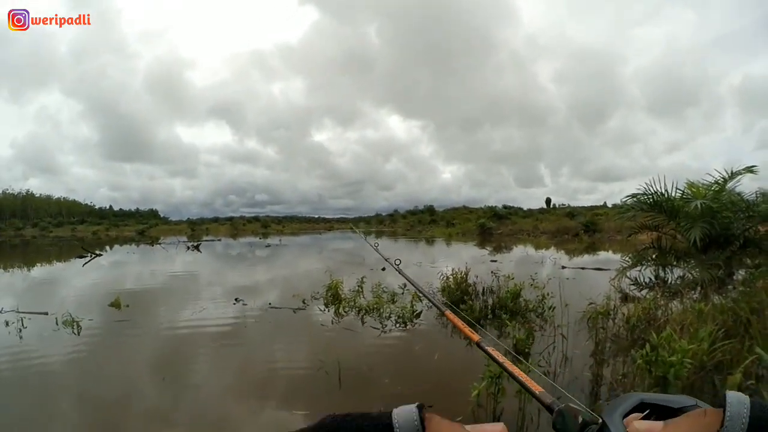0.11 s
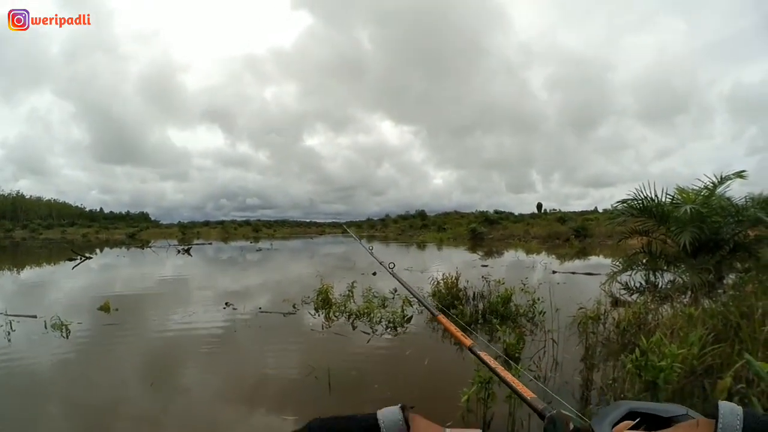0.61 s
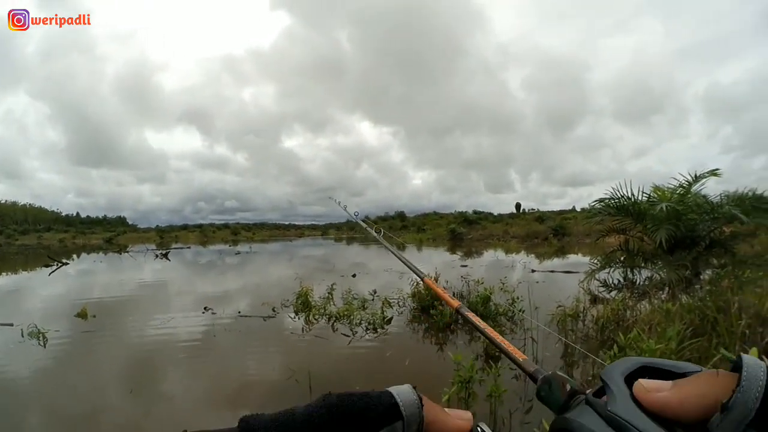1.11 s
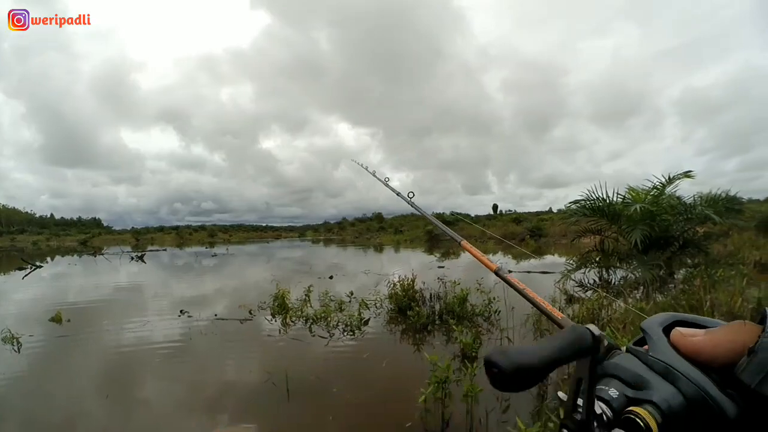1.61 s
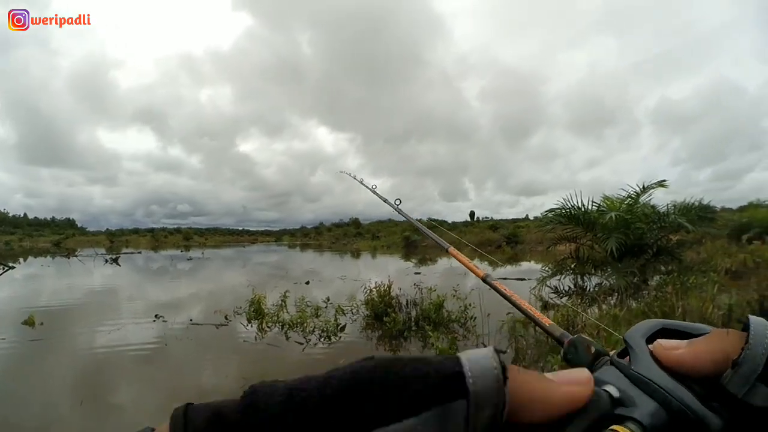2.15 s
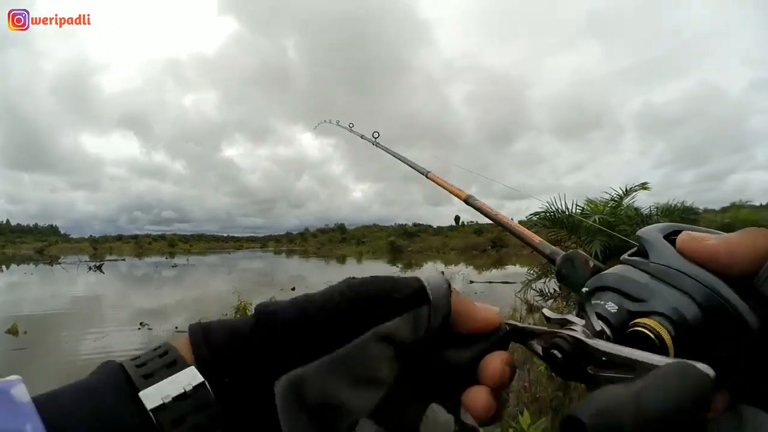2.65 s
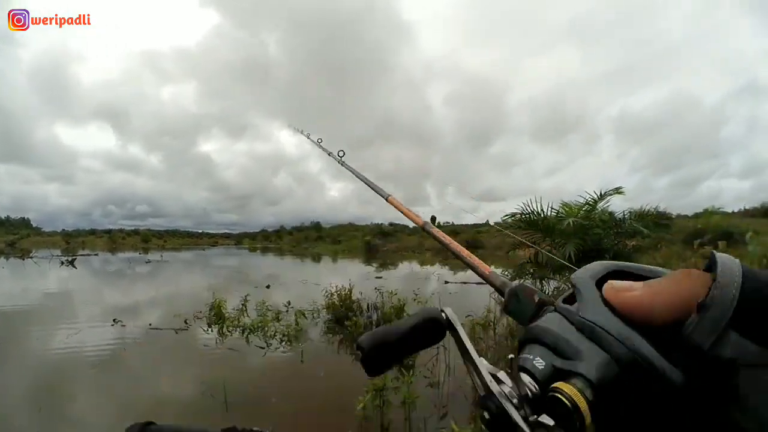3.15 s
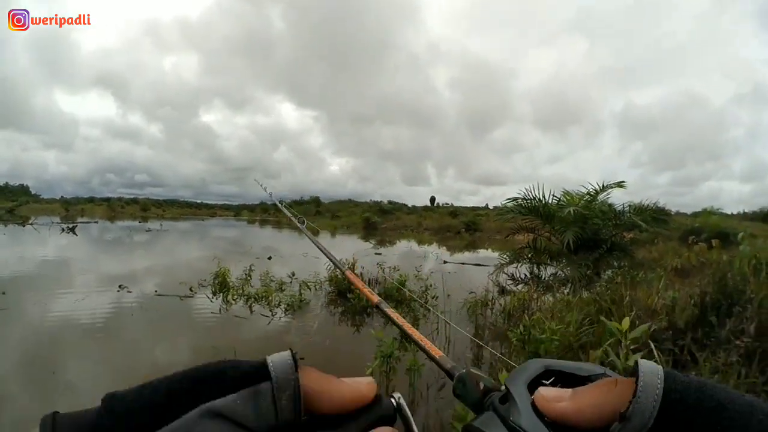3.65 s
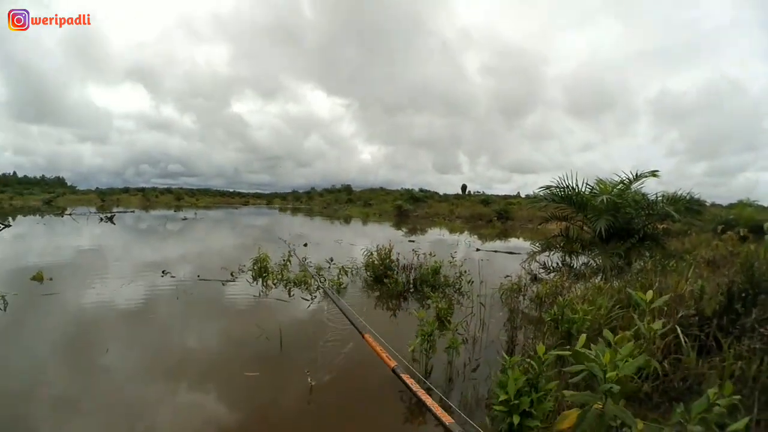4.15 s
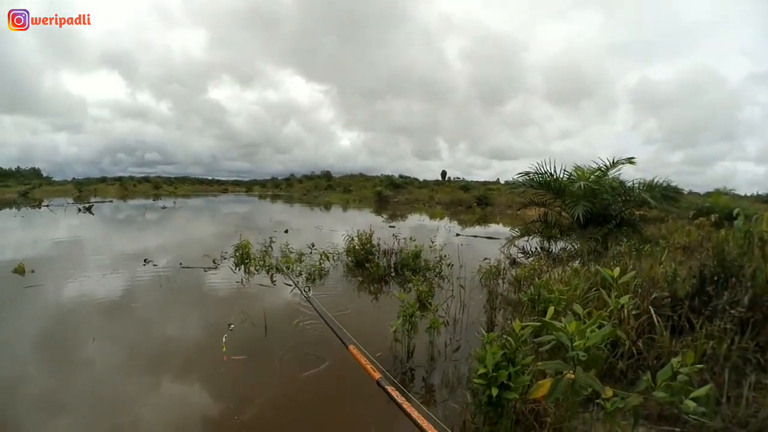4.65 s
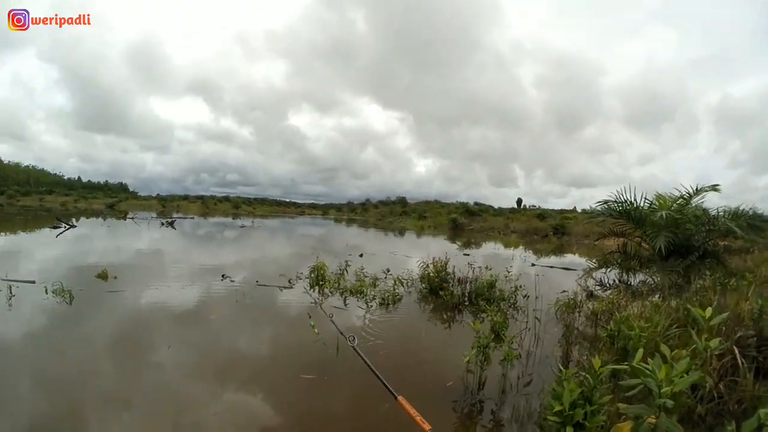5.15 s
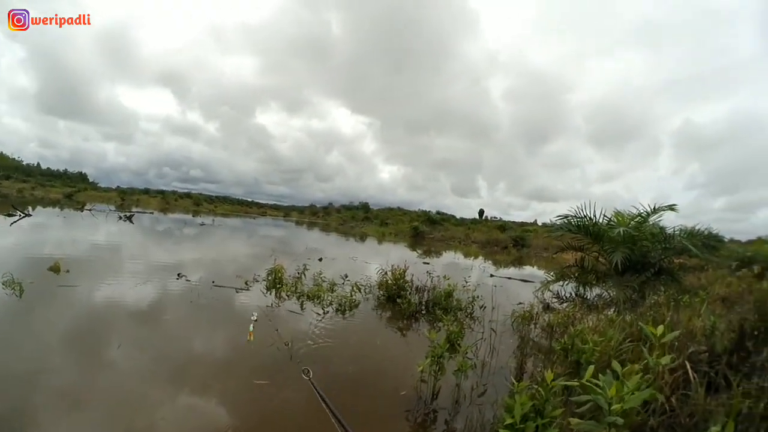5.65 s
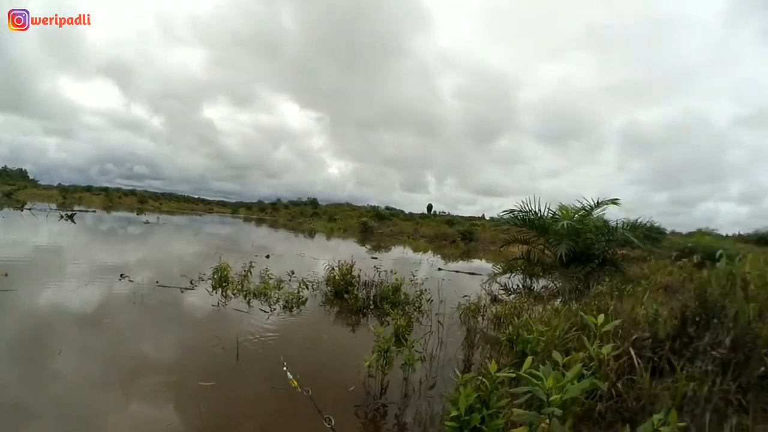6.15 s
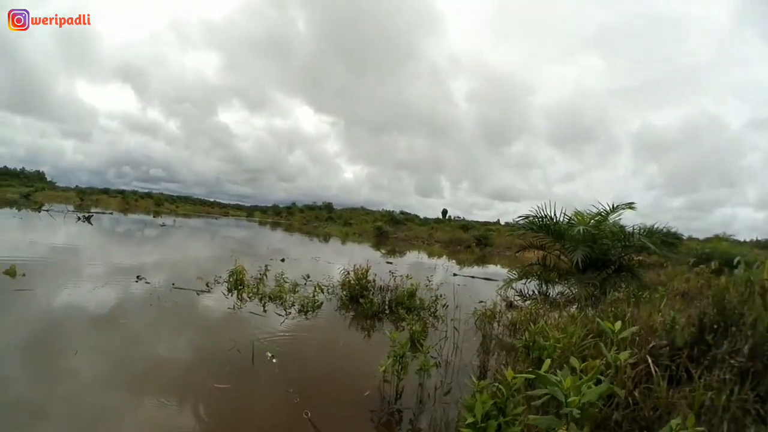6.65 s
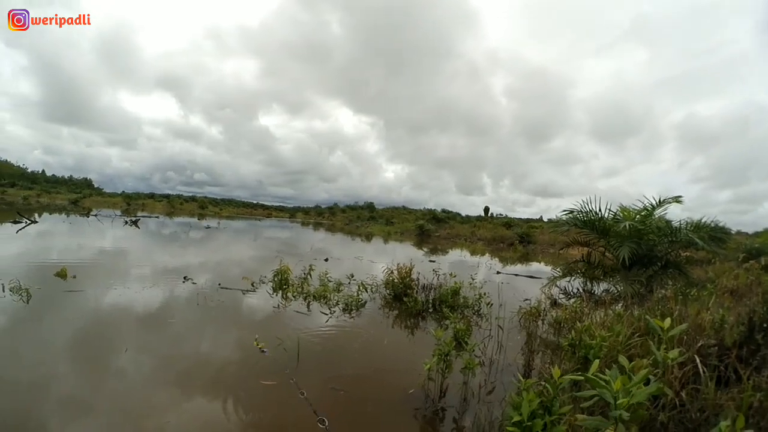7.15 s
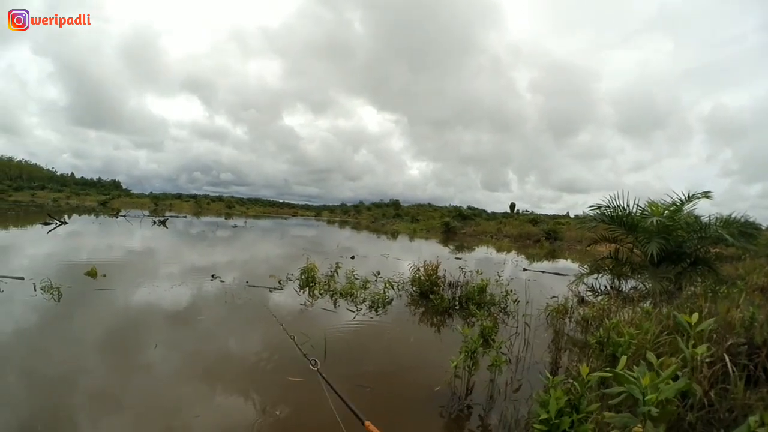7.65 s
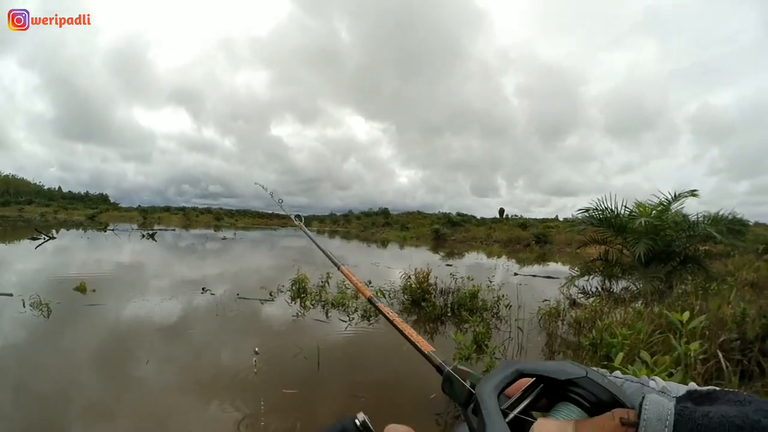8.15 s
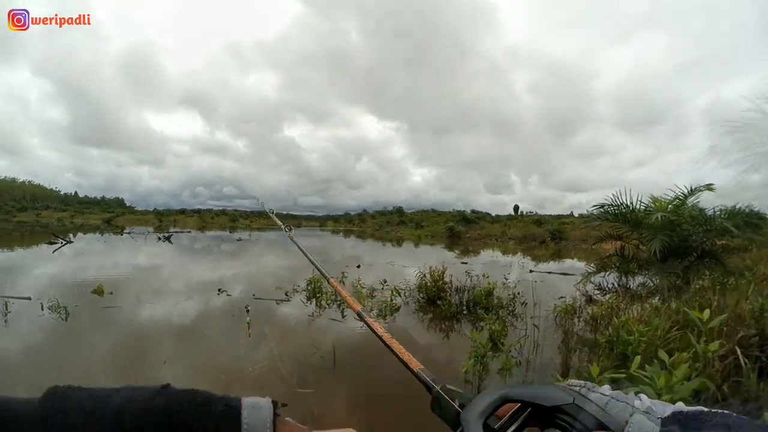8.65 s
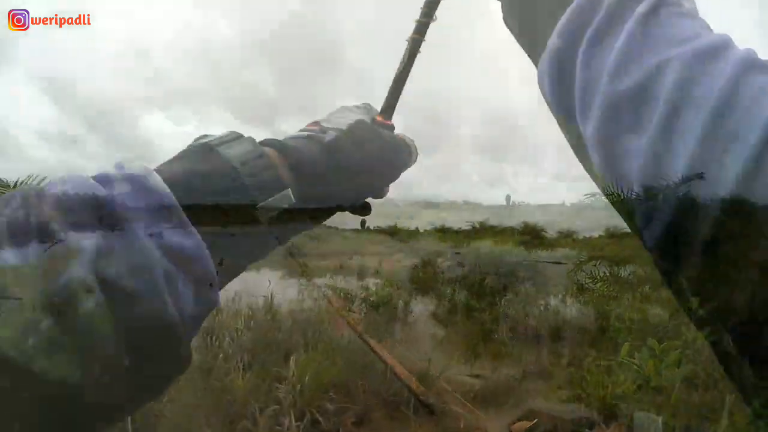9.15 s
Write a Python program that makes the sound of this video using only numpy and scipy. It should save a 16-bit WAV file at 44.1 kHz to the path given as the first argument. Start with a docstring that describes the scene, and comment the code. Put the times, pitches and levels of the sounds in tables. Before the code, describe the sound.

Dry, intimate fishing tackle noise by a still pond: gear rattle first, then glove rubbing, small plastic and metal contacts and loose hooks tinkling. The reel clacks sharply twice, late on, the second after a soft slide of line and a watery plip. Behind it lie gentle wind rumble, a faint low wavering hum and distant, repeated falling bird whistles.

```python
"""By a still pond an angler winds in a lure close to a chest-worn microphone, then handles rod and reel.
Noise drives resonances of rod, housing and metal: gears rattle, gloves rub, small contacts tick and scuff.
Hooks jingle, the clutch snaps hard twice as a set of decaying modes, dry clicks and sliding line join in,
and drops plop as rising sines. Two far birds repeat short gliding whistles over shaped-noise wind
and a low wavering hum."""
import sys
import numpy as np
from scipy import signal
from scipy.io import wavfile
from scipy.ndimage import uniform_filter1d

SR = 44100
rng = np.random.default_rng(int(sys.argv[2]) if len(sys.argv) > 2 else 0)


def ratio(d):
    """dB to gain"""
    e = np.asarray(d, float) / 20
    return 10 ** e


def transcribe(signal):
    """Save signal, clipped to [-1, 1], as a 16-bit WAV file at the path in sys.argv[1]."""
    frames = np.atleast_2d(signal).T
    limited = np.clip(frames, -1, 1)
    pcm = np.round(limited * 32767).astype(np.int16)
    wavfile.write(sys.argv[1], SR, pcm)


N = 408807

# resonances of the reel housing and of its thin metal: (frequency [Hz], width [Hz], level [dB])
HOUSING = [(3600, 380, -5), (4250, 250, -1), (4900, 300, 0), (6200, 420, -2), (7300, 300, -7)]
METAL = [(8100, 330, -3), (9100, 300, 0), (10500, 1600, -8), (12100, 650, -5), (14200, 2600, -13)]
GRIP_DETUNE = 0.035  # rms share by which a shifting grip detunes the parts
TICK_RISE_S = 0.00073


def tackle():
    """Winding, rubbing and single contacts all drive the same rod, housing and metal parts."""
    # resonances of the rod: (frequency [Hz], width [Hz], level [dB])
    rod = [(370, 220, -0.5), (730, 630, 0.5), (1130, 400, -0.5), (1620, 1510, -0.5), (2180, 220, 1.5)]
    # effort of the gloved hands on the rod: (time [s], rubbing drive [dB])
    effort = [(0, -58.5), (.62, -60.5), (.7, -64), (.9, -58.5), (2.18, -61.5), (2.68, -59.5), (3.47, -56),
              (3.99, -62), (4.63, -69), (5.1, -72), (5.3, -61.5), (5.75, -64.5), (6.0, -72), (6.6, -71.5),
              (6.8, -59.5), (7.05, -73), (7.35, -72.5), (7.56, -61), (7.8, -69), (8.1, -68.5), (8.45, -67),
              (8.85, -72), (9.05, -70.5), (9.27, -68.5)]
    hands = ratio(curve(effort))
    favour_db = 3 * drift(count=15, size=14).reshape(3, 5, N)  # the grip favours other modes
    drive = (winding() + rubbing(hands)) * ratio(favour_db)
    drive = drive + fidgeting(hands) + contacts()
    return sum(ring(x, modes, GRIP_DETUNE) for x, modes in zip(drive, (rod, HOUSING, METAL)))


def winding():
    """Gear teeth knock the housing and rattle the metal; in a bout the rattle sags and climbs to higher modes."""
    # bouts of winding: (start [s], length [s], gear drive at the start [dB])
    winds = [(0, 0.34, -54), (0.456, 0.038, -57), (0.546, 0.083, -54), (0.753, 1.42, -52.5)]
    sag_db_per_s, brighten_db_per_octave_s, metal_db = 5, 5.5, -10
    t = np.arange(N) / SR
    starts = np.array(winds)[:, 0]
    latest = np.maximum(np.searchsorted(starts, t) - 1, 0)
    since_s = np.minimum(t - starts[latest], 1.5)
    octave = np.log2(np.array([HOUSING, METAL])[:, :, :1] / 4500)
    slope_db_per_s = brighten_db_per_octave_s * np.minimum(octave, 1) - sag_db_per_s
    crank = bouts(winds, 0.0031, 0.02) * ratio(slope_db_per_s * since_s)
    gears = grains(420, 2.0, 12, .014, .45, count=5)
    rattle = grains(300, 2.2, 11, .016, .55, count=5)
    return np.array([np.zeros((5, N)), gears * crank[0], rattle * crank[1] * ratio(metal_db)])


def rubbing(hands):
    """Gloves grate along the rod; part of the friction shakes the housing and the metal."""
    to_housing_db, to_metal_db = -8.5, -9
    rub = grains(140, 2.0, 8, .04, .9, count=5) * hands
    # housing takes the mode drives in reverse order
    return np.array([rub, rub[::-1] * ratio(to_housing_db), rub * ratio(to_metal_db)])


def fidgeting(hands):
    """Stray little ticks come at random moments, as strong as the hands are busy."""
    # drive relative to the hands on (rod [dB], housing [dB], metal [dB])
    share_db = [-15.5, -15, -21.5]
    ticks = grains(30, 2.5, 9, .025, 0, count=15).reshape(3, 5, N)
    return ticks * hands * ratio(share_db)[:, None, None]


def contacts():
    """Short ticks and longer scuffs: each is one ragged burst shared out over the three parts."""
    # short ticks: (time [s], drive before trims [dB], rod share [dB], metal share [dB])
    ticks = [(.042, -34.5, -27, -15), (.2024, -40, -22, -27), (0.278, -38, -23, -21),
             (0.3235, -31.5, -14, -13), (.352, -43, -28, -25), (0.4627, -36, -38, -38),
             (0.7625, -39, -19, -30), (0.9783, -33.5, -23, -24), (1.0, -42, -7.5, -24),
             (1.036, -38, -31, -24), (1.1268, -34, -35, -21), (1.281, -43, -23, -23),
             (2.047, -44, -28, -18), (2.0605, -39, -30, -8), (2.085, -36, -19, -6), (2.143, -47, -25, -13),
             (2.9578, -40, -32, 0.5), (4.3445, -49.5, 0, -29), (5.2634, -50, 3, -30),
             (5.3255, -40, -2, -5.5), (5.37, -33.5, 0, -15), (5.4534, -32.5, -19, -14.5),
             (5.8721, -38, -10, -17), (5.886, -41.5, -2.5, -17), (5.9085, -47, -7, -16),
             (5.921, -47.5, -0.5, -6), (6.101, -44.5, -13, -12), (6.258, -49, -17, -22),
             (6.2961, -39.5, -12, -19), (6.4168, -42, -1, -13), (6.641, -43.5, 1, -20),
             (6.8851, -49, -3, -20), (6.9684, -59, 9, -18), (7.0053, -57, 6.5, -14), (7.0337, -56, 2, -20),
             (7.121, -51, -3.5, -18.5), (7.4056, -35.5, -14, -27), (7.5393, -39.5, -25, -18),
             (7.6021, -35.5, -6, -22), (7.6324, -44, 0, -19), (7.655, -40.5, -12, -16),
             (8.277, -36.5, -10, -7), (9.0952, -48, -3.5, -18)]
    # longer scuffs: (time [s], drive before trims [dB], rod share [dB], metal share [dB])
    scuffs = [(2.4887, -66.5, 15.5, 6), (2.848, -64, 12, -13), (3.366, -44.5, -16, -14),
              (3.8866, -46, 1, -5), (3.9702, -50, -3.5, -14), (4.0663, -53.5, -0.5, -4),
              (4.166, -52, 0.5, -12), (4.2769, -59.5, 12, -4), (4.4247, -50.5, -9, -13),
              (4.438, -68, 12.5, -13), (4.5825, -51.5, -14, -15), (5.4225, -60, -24, 2),
              (5.446, -41, -6.5, -5), (5.5338, -49.5, -11, -4), (5.64, -57, -2, -15),
              (5.7572, -51, -1, -18), (6.3136, -53, -3.5, -9), (6.4026, -55, 1, -8),
              (6.598, -50.5, -6, -13), (6.660, -41, -4.5, -13), (6.7451, -49, -12, -10),
              (6.7965, -44.5, -11.5, -11.5), (6.8487, -54.5, -8, 2.5), (7.235, -57.5, -12, -2),
              (7.3634, -45, -5.5, -18.5), (7.473, -57.5, 0.5, 1.5), (7.7294, -50.5, -4, -7),
              (7.757, -69, 12.5, -13), (7.8822, -50, -10.5, -6), (8.5990, -52, -2.5, -10),
              (8.7315, -57.5, -7.5, -11), (9.1551, -54, -6, -31.5)]
    drive = np.zeros((3, 5, N))
    # (rows, t60 [s], hold [s], rise [s])
    for rows, t60, hold_s, rise_s in ((ticks, 0.032, 0, TICK_RISE_S), (scuffs, 0.11, 0.009, 0.0017)):
        for s, db, rod_db, metal_db in rows:
            parts = burst(t60, hold_s, rise_s, 4.7, count=15).reshape(3, 5, -1)
            part_db = db + np.array([rod_db + 0.5, -5, metal_db])  # rod and housing are trimmed
            add(drive, s, ratio(part_db)[:, None, None] * parts)
    return drive


def reel_blows():
    """Each blow cracks and rings the frame's modes, loose parts roughen the ring, and a dull rattle follows."""
    # blows on the reel frame, two hard clutch snaps with rebounds and two duller knocks:
    # (time [s], peak [dB], brightness [dB per octave],
    # ring time as a factor: below 1 damped short, above 1 ringing longer [1], weight below 700 Hz [dB])
    blows = [(3.8878, -27.5, -2, 1.8, 7), (5.8109, -23.5, -3, 4.4, -8.5), (5.8117, -5, -0.5, 0.64, -25.5),
             (8.3046, -20.5, 3.5, 0.79, 0.5), (8.306, -7.5, -3, 1.5, -12), (8.3092, -9.5, 21, 0.12, -0.5),
             (8.3123, -10.5, -6.5, 0.45, 5.5), (8.326, -26, -11.5, 2.5, -2.5),
             (9.228, -40.5, -16, 1.6, -11)]
    # modes of the clutch and reel frame: (frequency [Hz], base level [dB], t60 before the factor [s])
    frame = [(356, -17.5, 0.019), (477, -9.5, 0.02), (771, -6, 0.028), (1050, -15, 0.034),
             (1486, 6, 0.0093), (1960, 8, 0.0085), (2390, 8, 0.0064), (4045, 1.5, 0.0092),
             (4505, -1.5, 0.016), (4810, 2.5, 0.012), (5830, 10, 0.0017), (7350, -6, 0.002),
             (8520, -3, 0.011), (9900, -12, 0.014), (11250, -26.5, 0.046), (12260, -17, 0.017)]
    out, u = np.zeros(N), np.arange(8000) / SR
    hz, mode_db, t60 = np.transpose(frame)[:, :, None]
    grip = rng.uniform(.97, 1.03, (len(blows), len(frame), 1))  # the holding hand detunes the frame
    sign = (-1.) ** np.arange(len(frame))[:, None]
    band = signal.butter(2, [900, 11000], "bandpass", fs=SR)
    for (s, db, bright_db, ring_factor, weight_db), tune in zip(blows, grip):
        tilt_db = bright_db * np.log2(np.minimum(hz, 9000) / 2000)  # harder contact is brighter
        level_db = mode_db + weight_db * (hz < 700) + tilt_db - 60 * u / (ring_factor * t60)
        modes = sign * ratio(level_db) * np.sin(2 * np.pi * hz * tune * u)
        noise = signal.lfilter(*band, rng.standard_normal(len(u)))
        crack = ratio(-14.5 + 2.0 * bright_db - 60 * u / 0.022) * noise
        loose = ratio(4.0 * wander(modes.shape, size=90) * np.minimum(u / .004, 1))
        blow = ((modes * loose).sum(0) + crack) * np.minimum(u / 0.0004, 1)
        add(out, s, ratio(db) * blow / abs(blow).max())
    u = u[:3000]
    dull = signal.lfilter(*signal.butter(1, 2500, fs=SR), rng.standard_normal(len(u)))
    rattle = ratio(-32.0 - 60 * u / 0.054) * dull * (u > .001)
    return out + signal.oaconvolve(out, rattle)[:N]


def hooks():
    """Loose hooks knock together and ring thinly: ragged bursts drive narrow high resonances."""
    # hooks and rings: (frequency [Hz], width [Hz], level [dB])
    modes = [(6200, 70, -3), (7400, 90, -1), (8450, 70, -3), (9350, 80, 0), (11800, 60, -1)]
    # knocks: (time [s], drive [dB])
    jingles = [(2.309, -52), (2.387, -48.5), (3.42, -47.5), (3.921, -46.5), (5.326, -53), (5.463, -47),
               (5.534, -61), (5.546, -52), (6.859, -51)]
    drive = np.zeros((len(modes), N))
    for s, db in jingles:
        add(drive, s, ratio(db) * burst(0.098, 0, TICK_RISE_S, 4, count=len(modes)))
    return ring(drive, modes)


def clicks():
    """Dry clicks without resonance: a sine that rises over one cycle and is 60 dB down after 4.9."""
    # clicks: (time [s], level before the decay [dB], pitch [Hz])
    rows = [(2.29, -25, 6230), (2.8988, -33, 2600), (3.2144, -25.5, 2900), (3.2925, -28.5, 3680),
            (3.3390, -36, 2700), (3.5606, -32, 2930), (4.375, -37, 4120), (7.9884, -27.5, 1750),
            (8.183, -41, 2500)]
    out, u = np.zeros(N), np.arange(600) / SR
    for s, db, hz in rows:
        envelope = ratio(db - 60 * u * hz / 4.9) * np.minimum(u * hz, 1)
        add(out, s, envelope * np.sin(2 * np.pi * hz * u))
    return out


def spool():
    """Line sliding off the spool hisses through the guides; the spool hums faintly as a narrow resonance."""
    # line slides off: (start [s], length [s], drive [dB])
    payout = [(7.875, .45, -64)]
    # colour of the sliding line: (frequency [Hz], width [Hz], level [dB])
    guides = [(4000, 5700, 0)]
    # hollow ring of the spool: (frequency [Hz], width [Hz], level [dB])
    hollow_mode = [(860, 63, 0)]
    # ringing: (start [s], length [s], drive [dB])
    ringing = [(3.45, 0.39, -70), (8.02, 0.39, -66.5)]
    hiss, hollow = rng.standard_normal((2, 1, N))
    sliding = ring(hiss * bouts(payout, .01, 0.065), guides)
    return sliding + ring(hollow * bouts(ringing, 0.066, 0.11), hollow_mode, GRIP_DETUNE)


def drops():
    """A drop traps a bubble in the water, which rings, wobbles and rises in pitch."""
    # drops: (time [s], level before the decay [dB], start pitch [Hz], end pitch [Hz], t60 and length [s])
    rows = [(3.41, -45.5, 555, 590, 0.12), (6.672, -35, 520, 538, 0.017), (8.1815, -37, 666, 1450, 0.12),
            (8.211, -46.5, 690, 1490, 0.11), (8.578, -45, 950, 4500, 0.052)]
    out = np.zeros(N)
    for s, db, start_hz, end_hz, t60 in rows:
        u = np.arange(0, t60, 1 / SR)
        wobble = 1 + .015 * wander(len(u), size=150)
        hz = (start_hz + (end_hz - start_hz) * u / t60) * wobble
        envelope = ratio(db - 60 * u / t60) * np.minimum(u / 0.0022, 1)
        add(out, s, envelope * np.sin(2 * np.pi * np.cumsum(hz) / SR))
    return out


def birds():
    """Two far birds repeat near-sine notes that fade as they glide and flutter with the air between."""
    # first bird, falling note: (time [s], level before the fade [dB])
    whistles = [(2.19, -69), (2.6, -69), (3.0, -70), (4.143, -66), (4.519, -64.5), (4.906, -65),
                (5.287, -65), (5.684, -67), (6.094, -65.5), (6.495, -64.5), (6.875, -65.5), (7.273, -68),
                (8.095, -66.5)]
    # one falling note: (time [s], pitch [Hz])
    fall = [(0, 5980), (.03, 4740), (.06, 3440), (.1, 2626)]
    # second bird, rising then falling note: (time [s], level before the fade [dB])
    arches = [(4.786, -71), (6.035, -72), (7.197, -71), (8.36, -71.5)]
    # one such note: (time [s], pitch [Hz])
    arch = [(0, 3600), (.035, 4860), (.09, 3100)]
    fade_db_per_s = 60
    out = np.zeros(N)
    for shape, calls in ((fall, whistles), (arch, arches)):
        s, hz = np.transpose(shape)
        u = np.arange(0, s[-1], 1 / SR)
        tone = np.sin(2 * np.pi * np.cumsum(np.interp(u, s, hz)) / SR)
        note = tone * signal.windows.tukey(len(u), .2) * ratio(-fade_db_per_s * u)
        for at, db in calls:
            add(out, at, ratio(db) * note)
    tap = np.arange(600)
    echoes = rng.standard_normal(600) * ratio(-26 - tap / 16) + (tap == 0)
    out = signal.oaconvolve(out, echoes / np.linalg.norm(echoes))[:N]  # reeds scatter the note
    return out * ratio(2.5 * wander(N, size=300))


def air():
    """Gusty rumble under a hush that dips briefly near the end and comes back stronger; ports differ a little."""
    # wind and outdoor hush: (frequency [Hz], relative density [dB])
    bed_spectrum = [(4, 3), (8, 6.5), (26, -11.5), (59, -12.5), (138, -17), (336, -25), (450, -30.5),
                    (570, -46.5), (820, -31.5), (1870, -60.5), (3000, -42), (4700, -35), (7000, -39.5),
                    (12000, -48.5), (14000, -66.5)]
    # wind unlike at the two microphone ports: (frequency [Hz], relative density [dB])
    port_spectrum = [(3, 3), (12, -12.5), (30, -14.5), (80, -27), (142, -42), (400, -80)]
    # gusts, used relative to the mean of the rows: (time [s], level [dB])
    gusts = [(0.0, -57), (3.07, -55.5), (3.9, -53), (4.157, -57), (9.27, -59)]
    # gain of the hush: (time [s], level [dB])
    hush = [(0, -8.5), (8.699, -9), (8.8, -15.5), (9.27, -6)]
    bed_db, port_db = -50, -50.5
    gust = ratio(curve(gusts) - np.mean(np.array(gusts)[:, 1]))
    bed = ratio(bed_db) * coloured(bed_spectrum, 0.42)
    rumble = signal.sosfiltfilt(signal.butter(2, 70, fs=SR, output="sos"), bed)
    mid = (bed - rumble) * ratio(curve(hush)) + gust * rumble + hum()
    side = ratio(port_db) * gust * coloured(port_spectrum, 2.4)
    return np.array([mid + side, mid - side])


def hum():
    """A low sine of wavering pitch rests faintly and swells up now and then."""
    # swells on top of the resting hum: (start [s], length [s], level [dB])
    swells = [(0.037, 0.17, -68), (2.577, 0.17, -66), (3.674, 0.1, -66), (3.838, 0.071, -59.5),
              (4.98, 0.081, -65), (5.263, 0.026, -66), (5.537, 0.021, -59), (6.1, 0.067, -59),
              (6.929, 0.056, -67), (7.367, 0.093, -67.5), (7.554, 0.13, -66), (8.248, 0.082, -64)]
    centre_hz, waver_hz, rest_db = 176.5, 8, -71.5
    hz = centre_hz + waver_hz * wander(N, size=2000)
    tone = np.sin(2 * np.pi * np.cumsum(hz) / SR) * np.sqrt(2)
    return (ratio(rest_db) + bouts(swells, 0.0055, 0.018)) * tone


def ring(drives, modes, detune=0):
    """Each mode is a steep resonance on its own drive, wandering by detune; the sum is scaled by its power."""
    power = sum(ratio(2 * db) * np.pi * width / SR for hz, width, db in modes)
    out = 0
    for x, (hz, width, db), shift in zip(drives, modes, drift(count=len(modes), size=10)):
        turn = np.exp(2j * np.pi * np.cumsum(hz * (1 + detune * shift)) / SR)
        r = np.exp(-1.6 * np.pi * width / SR)
        # shift the mode down to 0 Hz, smooth with a double pole, shift back up
        smooth = signal.lfilter([(1 - r) ** 2], [1, -2 * r, r * r], x / turn)
        out = out + ratio(db) * 2 * (turn * smooth).real
    return out / np.sqrt(power)


def grains(per_s, spread_db, colour_db, t60, smooth, count):
    """Tiny knocks at random moments over steady friction (smooth); each knock favours other modes."""
    at = np.flatnonzero(rng.random(N) < per_s / SR)
    size_db = spread_db * np.minimum(rng.exponential(1, len(at)), 3)
    favour = np.clip(rng.standard_normal((len(at), count)).T, -3, 1.4)
    train = np.zeros((count, N))
    train[:, at] = ratio(size_db + colour_db * favour)
    pulses = uniform_filter1d(train, size=24)
    shape = signal.lfilter([1], [1, -ratio(-60 / (t60 * SR))], pulses)
    return evened(evened(shape) + smooth) * rng.standard_normal((count, N))


def burst(t60, hold_s, rise_s, colour_db, count):
    """One ragged contact lands firmly, holds, then chatters and dies, favouring modes that change as it goes."""
    u = np.arange(5000) / SR
    ragged_db = 3.6 * np.minimum(u / .012, 1) * wander(len(u), size=110)
    chatter = ratio(ragged_db + 3 * np.exp(-u / .003))
    shape = ratio(-60 * np.maximum(u - hold_s, 0) / t60) * np.minimum(u / rise_s, 1)
    colour = ratio(colour_db * np.clip(rng.standard_normal((count, 1)), -2, 1.2))
    colour = colour * ratio(3.5 * wander((count, len(u)), size=300))
    sound = shape * chatter * colour * rng.standard_normal((count, len(u)))
    # the energy follows the plain shape, whatever the chatter
    return 1.02 * sound * np.linalg.norm(shape) * np.sqrt(count) / np.linalg.norm(sound)


def coloured(points, patchy_db):
    """Noise of a given spectrum with drifting patches, at rms 1."""
    frames, hz = N // 1024 + 5, np.fft.rfftfreq(4096, 1 / SR)
    a, b, patches = rng.standard_normal((3, frames, len(hz)))
    patches = uniform_filter1d(patches, size=40, axis=1)
    patches = evened(uniform_filter1d(patches, size=3, axis=0))
    z = (a + 1j * b) * ratio(read(points, hz) + patchy_db * patches)
    return evened(signal.istft(z.T, nperseg=4096, noverlap=3072)[1][:N])


def read(points, hz):
    """Reads a spectrum table on a log-frequency axis."""
    f, value = np.transpose(points)
    return np.interp(np.log(hz + 1), np.log(f + 1), value)


def bouts(rows, rise_s, fall_s):
    """Gain of bouts that hold from start to end, with ramps before and after."""
    t = np.arange(N) / SR
    gain = 0
    for s, length, db in rows:
        ramps = np.minimum((t - s) / rise_s + 1, (s + length - t) / fall_s + 1)
        gain = gain + ratio(db) * np.clip(ramps, 0, 1)
    return gain


def curve(points):
    """Straight lines through (time [s], level [dB]) rows, sample by sample."""
    return np.interp(np.arange(N) / SR, *np.transpose(points))


def drift(count, size):
    """Slow random curves, one per mode, drawn every 200 samples and smoothed twice."""
    slow = wander((count, N // 200 + 2), size)
    slow = evened(uniform_filter1d(slow, size=size, axis=1))
    return np.array([np.interp(np.arange(N) / 200, np.arange(len(v)), v) for v in slow])


def wander(shape, size):
    """Noise smoothed over a number of samples, at rms 1."""
    return evened(uniform_filter1d(rng.standard_normal(shape), size=size))


def evened(x):
    """Scales to rms 1."""
    return x / np.sqrt(np.mean(x ** 2) + 1e-20)


def add(mix, s, sound):
    """Mixes a sound in at time s."""
    part = mix[..., round(s * SR):][..., :sound.shape[-1]]
    part += sound[..., :part.shape[-1]]


def scene():
    """All sources reach both microphone ports alike, apart from the wind."""
    return tackle() + reel_blows() + hooks() + clicks() + spool() + drops() + birds() + air()


def top_cut(x):
    """Nothing passes above the cut-off."""
    return signal.sosfilt(signal.butter(12, 16530, fs=SR, output="sos"), x)


def record(dry):
    """A steep band limit at 15.6 kHz; each channel sits on a small steady offset."""
    # steady offset of (left [full scale], right [full scale])
    offset = [.0161, -.0222]
    cut = signal.oaconvolve(dry, signal.firwin(401, 15600, fs=SR)[None], "same")
    mix = cut + np.array(offset)[:, None]
    return top_cut(mix)


dry = scene()
out = record(dry)
transcribe(out)
```